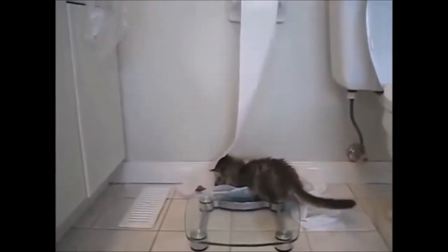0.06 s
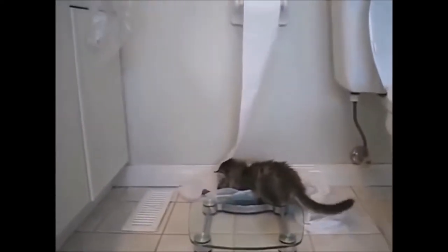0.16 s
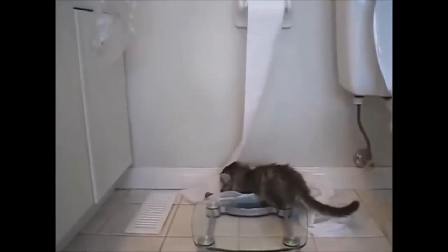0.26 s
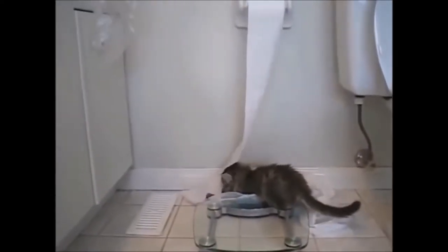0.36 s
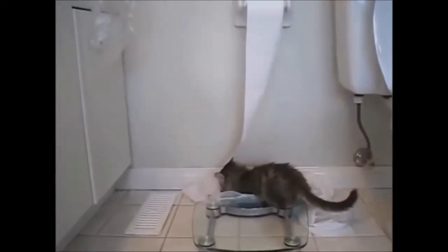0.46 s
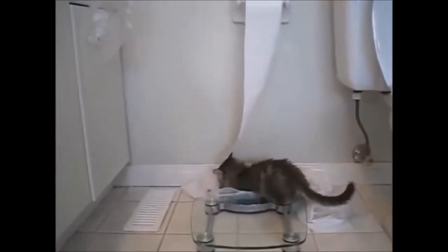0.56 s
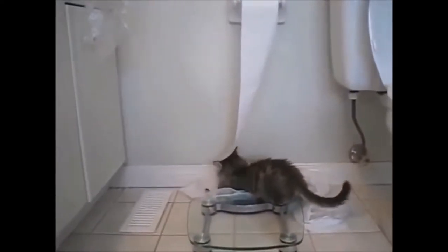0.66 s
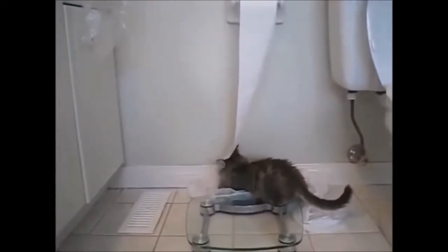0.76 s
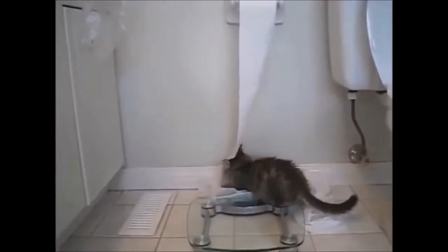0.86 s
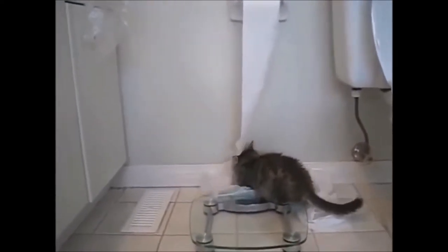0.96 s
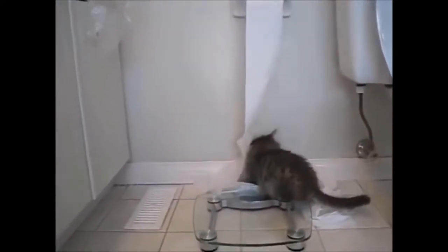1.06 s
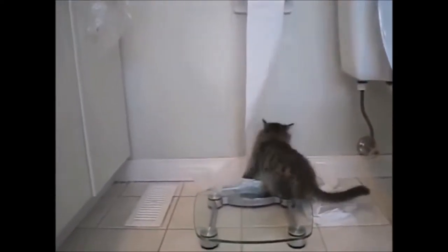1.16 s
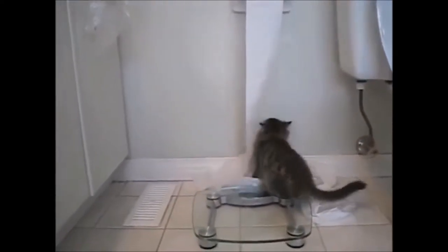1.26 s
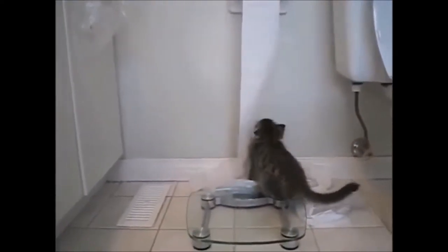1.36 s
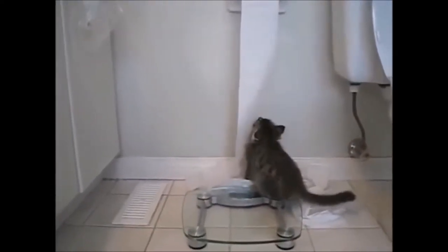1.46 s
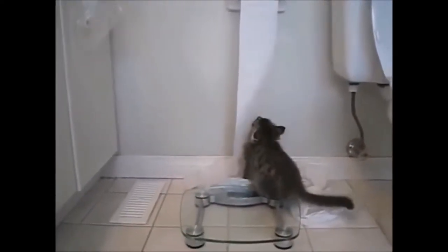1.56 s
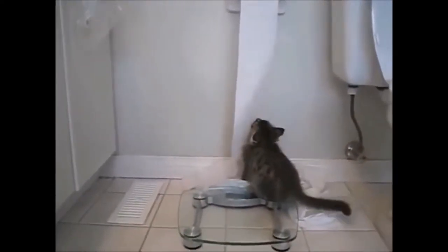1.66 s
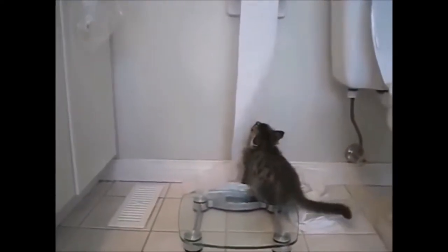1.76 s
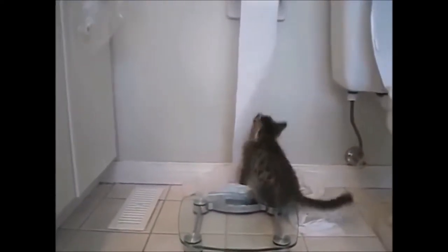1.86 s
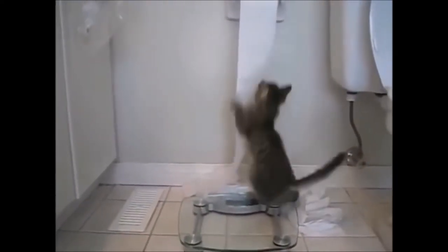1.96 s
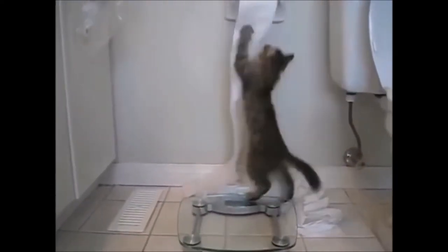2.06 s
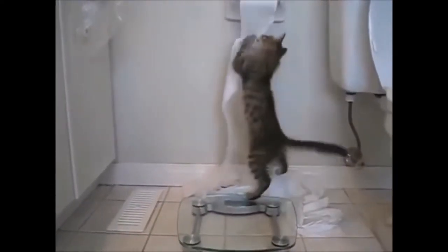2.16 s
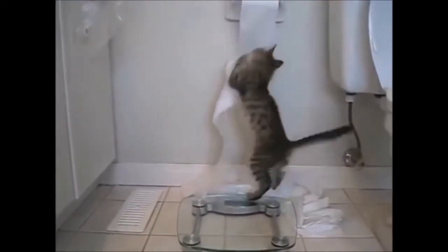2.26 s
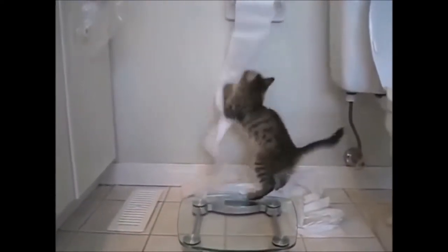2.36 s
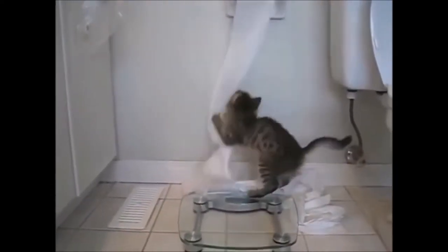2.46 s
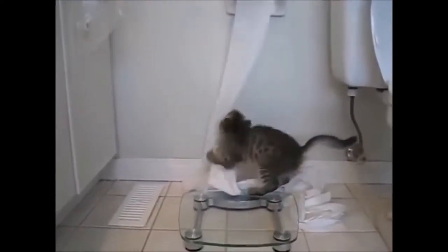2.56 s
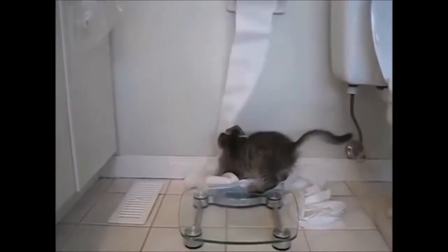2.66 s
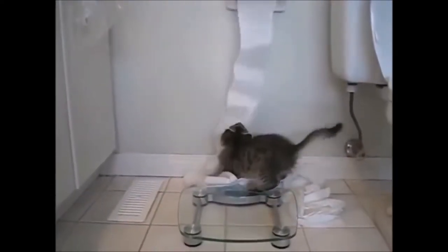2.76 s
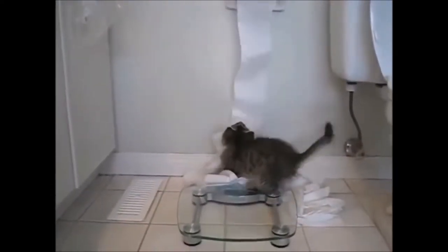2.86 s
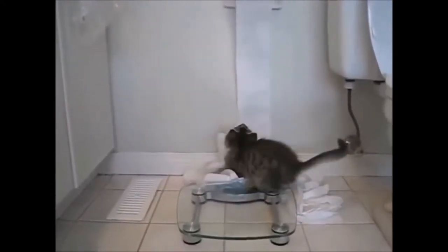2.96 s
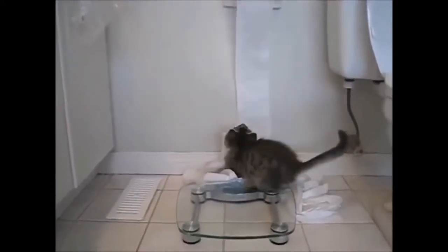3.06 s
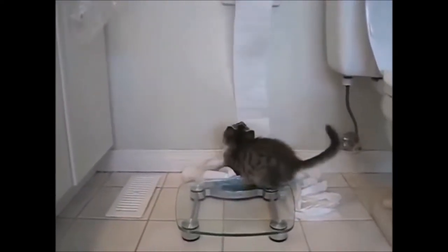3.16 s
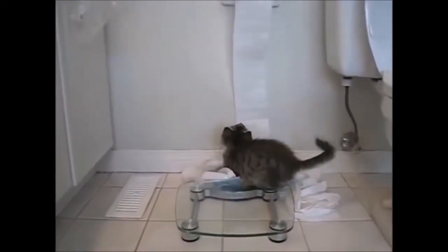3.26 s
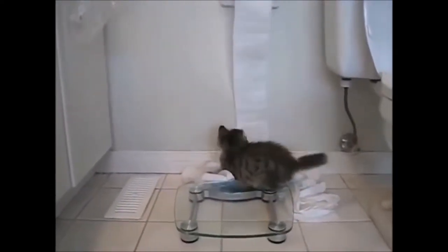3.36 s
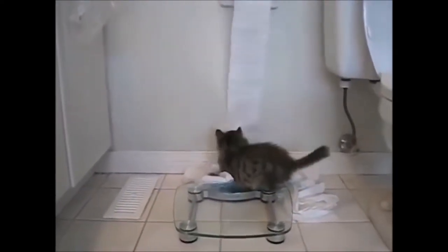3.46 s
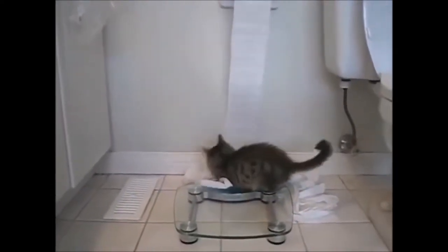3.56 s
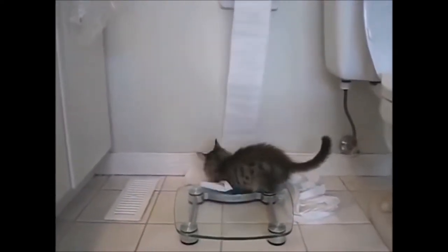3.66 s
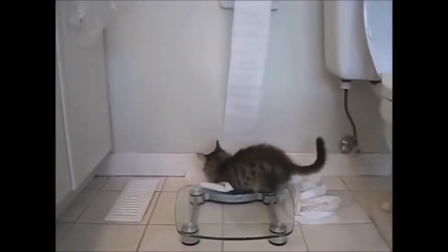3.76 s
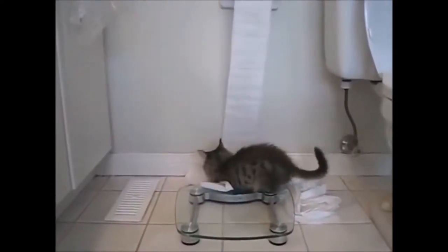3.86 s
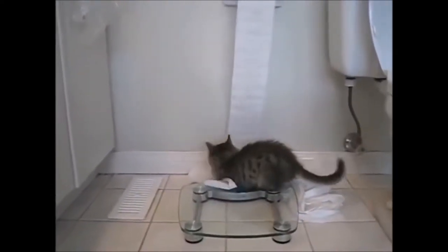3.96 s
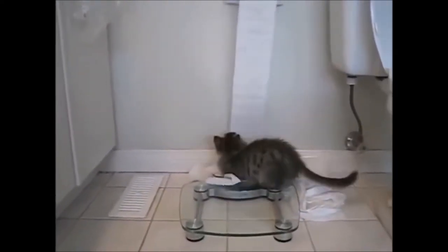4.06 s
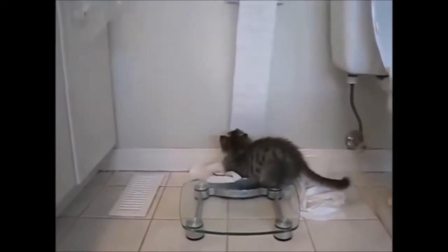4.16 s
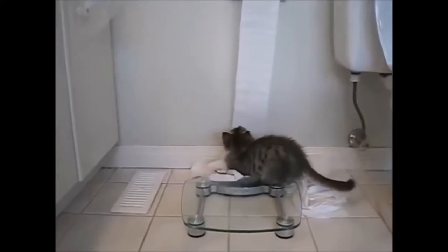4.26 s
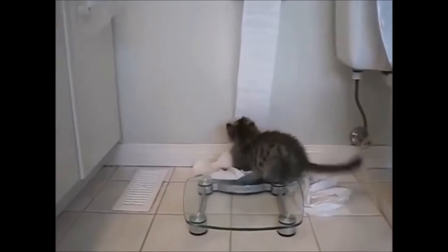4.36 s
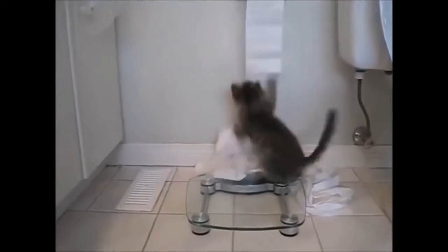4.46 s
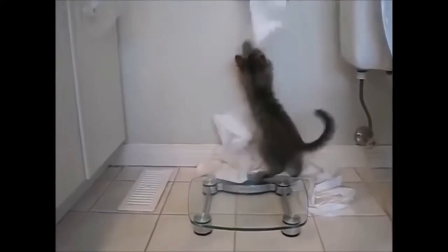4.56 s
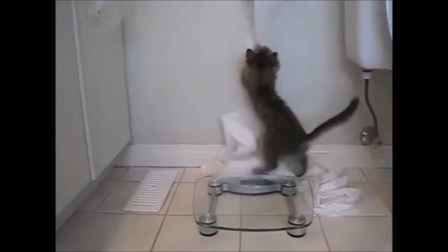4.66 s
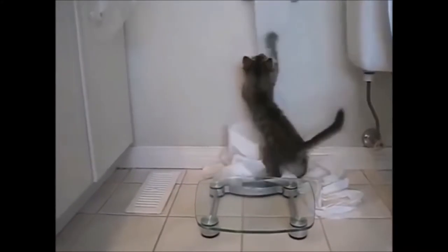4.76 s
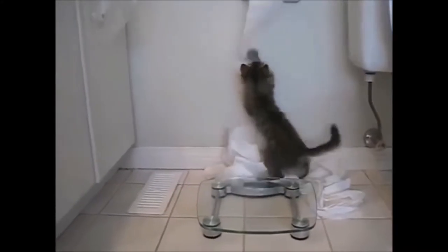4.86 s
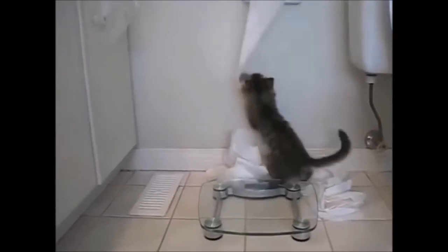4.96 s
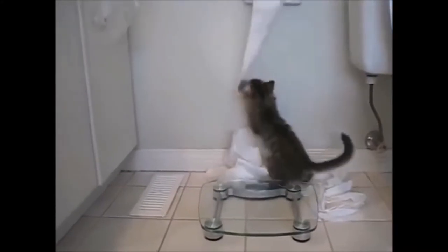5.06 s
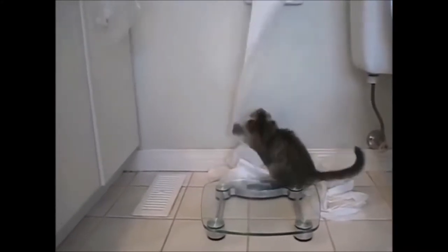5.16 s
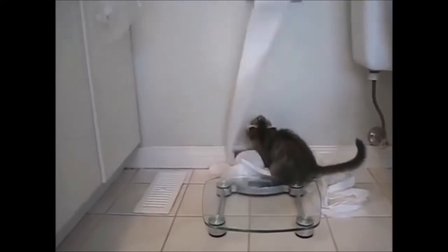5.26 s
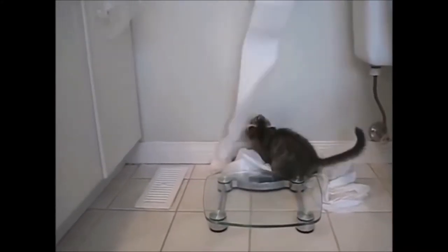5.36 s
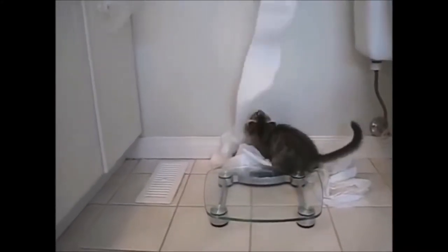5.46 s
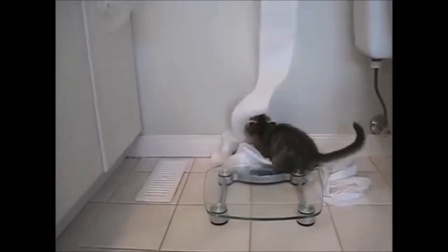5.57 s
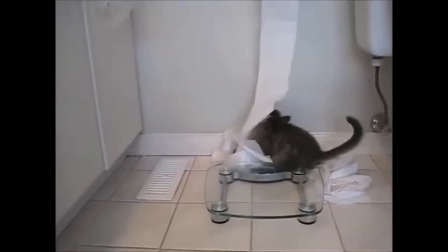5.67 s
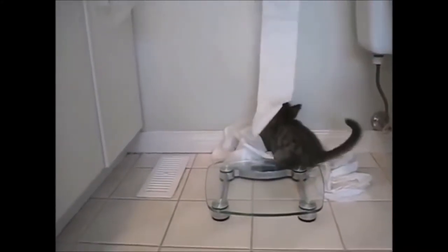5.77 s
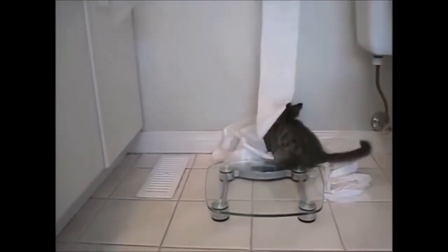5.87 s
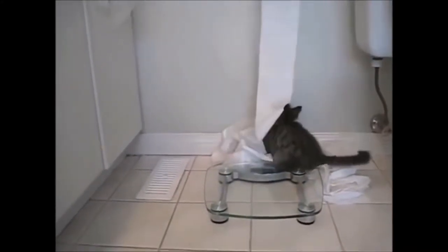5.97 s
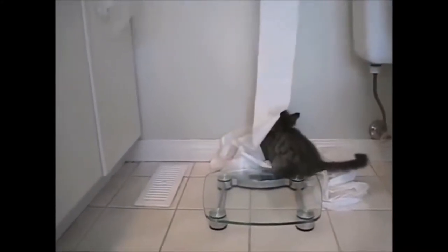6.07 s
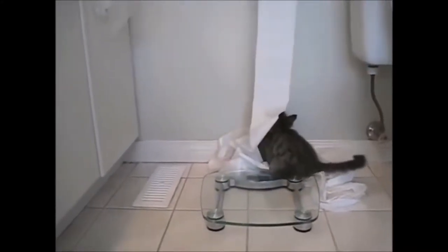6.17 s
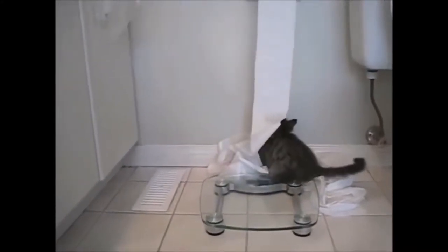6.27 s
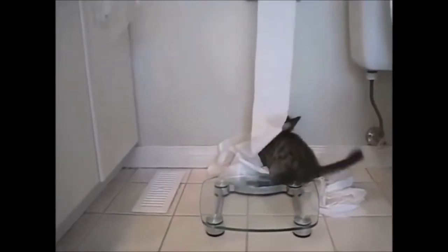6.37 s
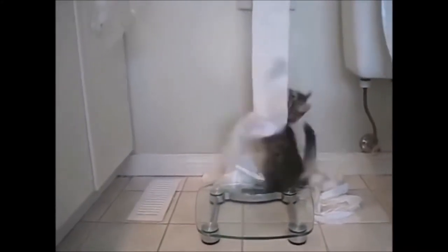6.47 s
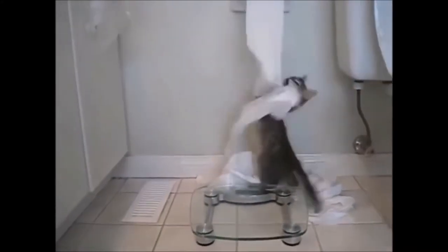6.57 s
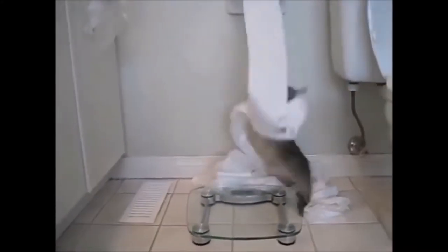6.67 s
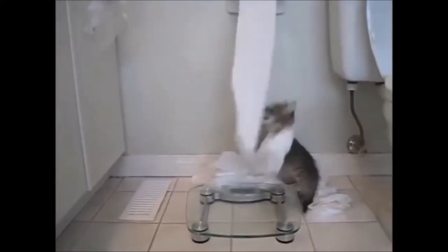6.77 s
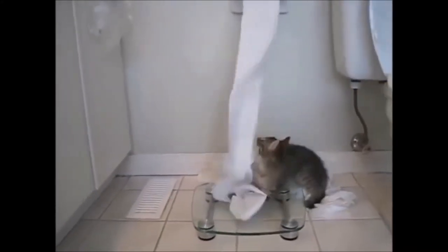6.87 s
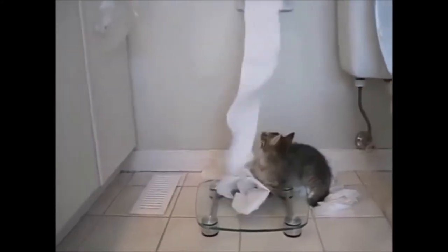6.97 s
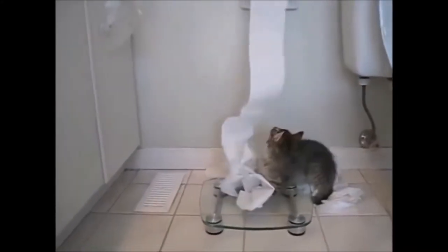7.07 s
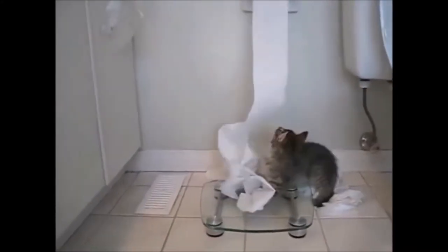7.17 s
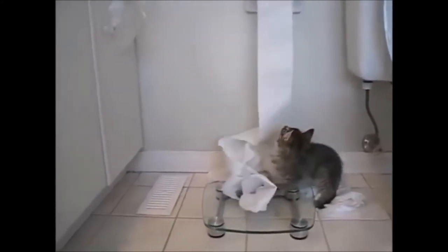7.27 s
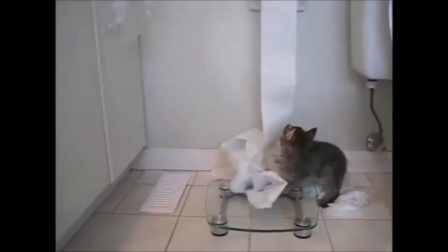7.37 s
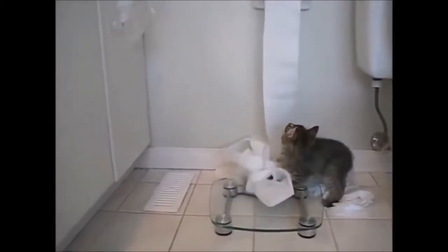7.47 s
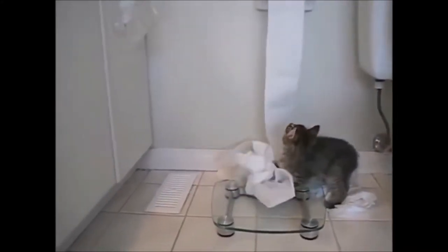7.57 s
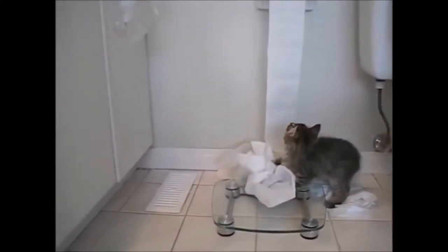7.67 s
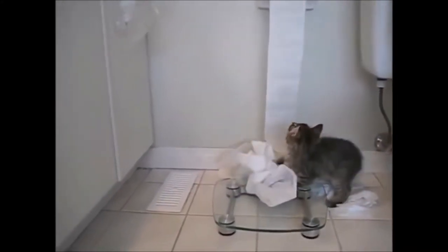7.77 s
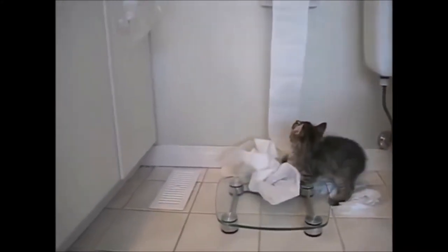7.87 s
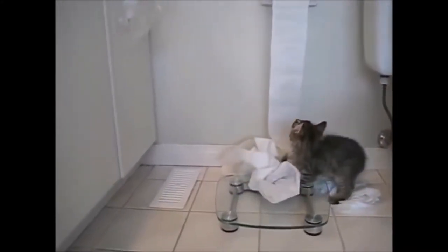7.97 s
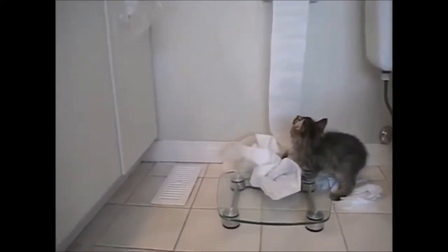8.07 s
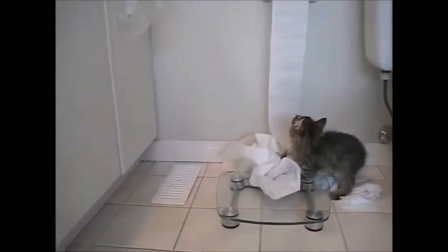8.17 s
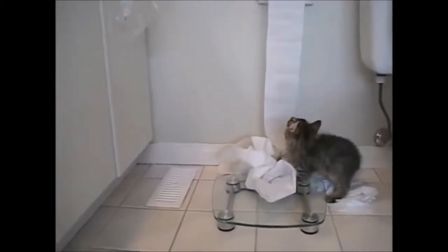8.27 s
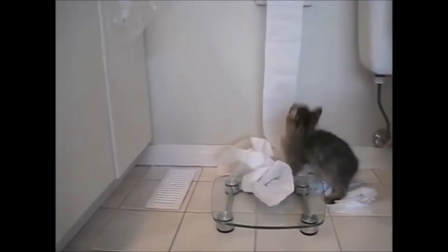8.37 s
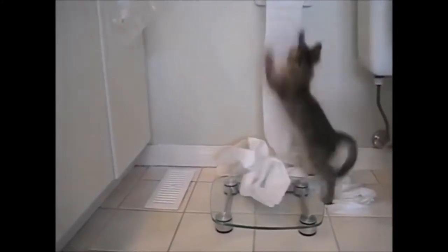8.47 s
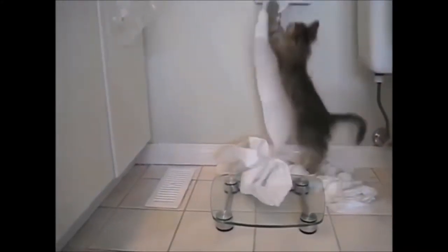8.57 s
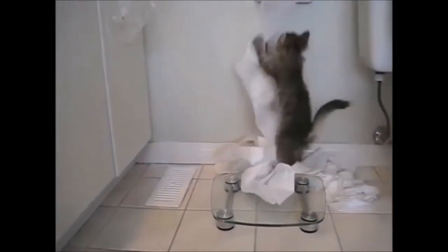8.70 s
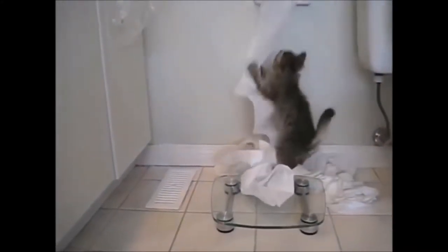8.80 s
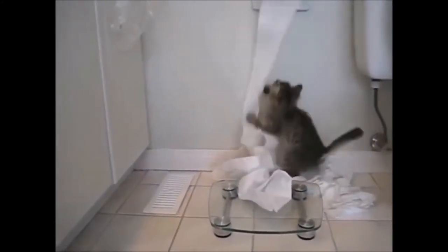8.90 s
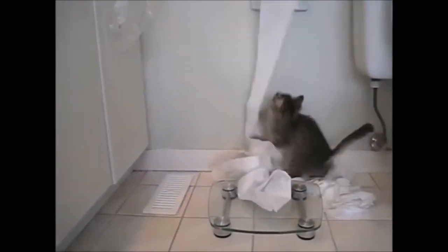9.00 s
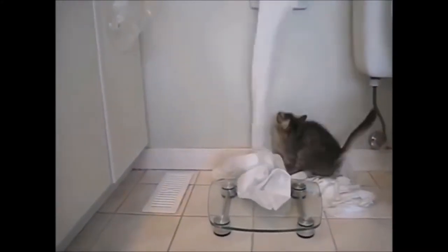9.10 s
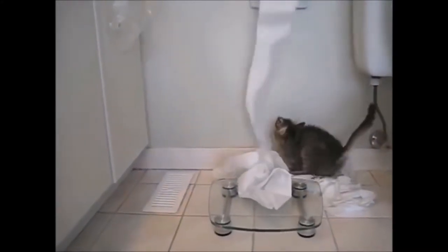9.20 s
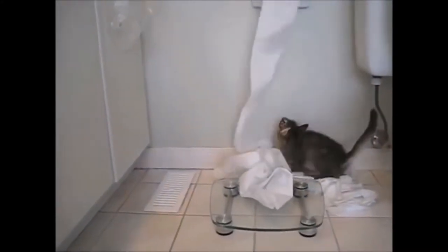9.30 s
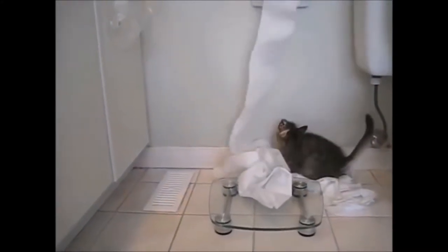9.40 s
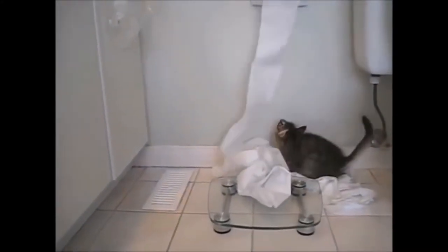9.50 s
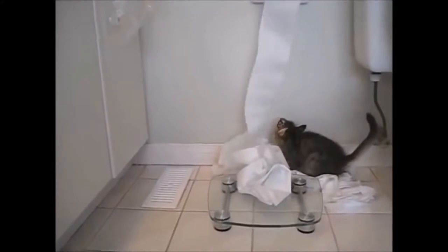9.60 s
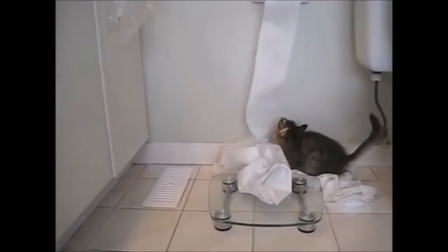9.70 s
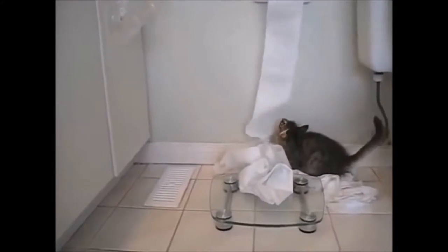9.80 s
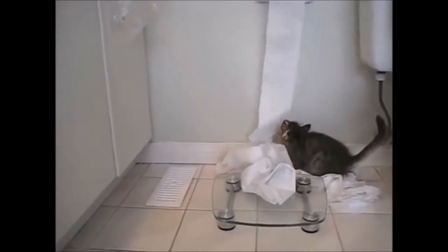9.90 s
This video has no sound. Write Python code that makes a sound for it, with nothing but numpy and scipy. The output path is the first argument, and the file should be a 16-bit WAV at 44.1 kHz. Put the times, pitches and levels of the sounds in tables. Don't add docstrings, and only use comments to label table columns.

```python
import sys
import numpy as np
from scipy import signal
from scipy.io import wavfile
from scipy.ndimage import uniform_filter1d

SR = 44100
rng = np.random.default_rng(int(sys.argv[2]) if len(sys.argv) > 2 else 0)


def to_linear_factor(level_db):
    exponent = np.asarray(level_db, float) / 20
    return 10 ** exponent


def inscribe(sig):
    pcm = np.round(np.clip(np.atleast_2d(sig).T, -1, 1) * 32767)
    wavfile.write(sys.argv[1], SR, pcm.astype(np.int16))


N = 438354

# [t/s, fade length/s, rustle level/dB, brightness/dB]
BRUSHES = [(0.0, 0.11, -53, -9), (.1, .15, -51, 0.5), (.18, 0.11, -42.5, -1), (.8, 0.42, -51, 9),
           (.95, 0.33, -49.5, -1.5), (1.05, 0.22, -51, -0.5), (1.3, 0.13, -44, -2.5),
           (1.41, 0.09, -49, -2.5), (2.01, 0.24, -50.5, -2), (3.15, 0.4, -54, -3.5),
           (3.52, 0.45, -44.5, -0.5), (4.1, 0.34, -49, -2), (4.65, 0.55, -43, -1), (5.78, 0.26, -55.5, 2),
           (5.92, 0.25, -51.5, 0.5), (6.56, .2, -48, -6), (7.4, 0.54, -47.5, -3.5), (7.49, 0.13, -47, 1),
           (8.49, 0.96, -54.5, 0)]
# [t/s, fade length/s, rustle level/dB, brightness/dB]
TUGS = [(2.3, .2, -51, -2), (2.385, 0.1, -43, -2), (2.78, 0.053, -36.5, -7), (4.85, 0.047, -35, -3.5),
        (4.95, 0.81, -39, -2), (5.09, 0.18, -37.5, -8.5), (5.22, 0.59, -40.5, -4), (5.38, 0.15, -36.5, 3),
        (5.48, 0.021, -33.5, 0.5), (5.575, .05, -47, -6), (5.67, 0.051, -43.5, -17), (6.68, 0.15, -32, 0),
        (6.88, 0.35, -33.5, -5.5), (6.98, 0.26, -35, -7), (7.13, 0.27, -36, -5), (7.58, 0.22, -43, 3.5),
        (9.26, 0.43, -37.5, -1.5), (9.55, 0.81, -51.5, -4)]
# [t/s, fade length/s, rustle level/dB, brightness/dB]
YANKS = [(.535, 1, -52, 1), (2.19, 0.18, -46, 2), (2.475, 0.37, -36.5, -5), (2.655, 0.32, -38.5, -2.5),
         (2.955, 0.22, -38.5, -4.5), (4.51, 0.44, -46, -2.5), (6.47, .3, -51.5, -3),
         (8.68, 0.31, -42, -6.5), (8.815, 0.14, -35, -7), (8.97, 0.48, -41.5, -2), (9.86, .3, -42, -3)]
# [f/Hz, level/dB per Hz]
TISSUE = [(150, -46), (250, -6.5), (380, -9.5), (476, -1.5), (547, -5.5), (906, -2.5), (2400, -1),
          (5070, -3.5), (7570, -10.5), (11300, -11), (16000, -21.5)]


def sheet():
    dulling_db = 4
    level_db, bright_db = blend(
        (-70.5, -12),
        strokes(BRUSHES, rise_db_per_s=236, bend=1.67, dulling_db=dulling_db),
        strokes(TUGS, rise_db_per_s=220, bend=1.61, dulling_db=dulling_db),
        strokes(YANKS, rise_db_per_s=700, bend=2.08, dulling_db=dulling_db))
    crumple = np.clip(0.5 + (level_db + 35.5) / 60, 0, 1)
    grains = crackle(N, 3000 * lumpy(70, 3.5), 1.8)
    hiss = rng.standard_normal(N) * lumpy(40, 0.39)
    drive = (1 - crumple) * hiss + crumple * grains
    body = evened(patchy(coloured(drive, TISSUE), depth_db=1.83))
    return to_linear_factor(level_db + 0.64) * (body + treble(body, 3130) * (to_linear_factor(bright_db + 1) - 1))


def strokes(rows, rise_db_per_s, bend, dulling_db=0):
    s, length, db, colour_db = np.transpose(rows)[:, :, None]
    late = np.arange(0, N, 64) / SR - s
    faded = np.maximum(late, 0) / np.maximum(length, 0.01)
    rise_db = rise_db_per_s * np.minimum(late, 0)
    fade_db = 20 * np.minimum(faded, 9) ** bend
    return to_linear_factor(db + rise_db - fade_db) ** 2, colour_db - dulling_db * faded


def blend(at_rest, *groups):
    power, colour_db = map(np.vstack, zip(*groups))
    rest_power = to_linear_factor(at_rest[0]) ** 2
    total = power.sum(0) + rest_power
    mean_db = ((power * colour_db).sum(0) + rest_power * at_rest[1]) / total
    curves = (10 * np.log10(total), mean_db)
    return [np.interp(np.arange(N), np.arange(0, N, 64), c) for c in curves]


def patchy(x, depth_db):
    hz, t, z = signal.stft(x, SR, nperseg=256)
    folds = rng.standard_normal(z.shape[::-1])
    folds = uniform_filter1d(uniform_filter1d(folds, size=12, axis=0), size=5, axis=1)
    return signal.istft(z * to_linear_factor(depth_db * evened(folds).T), SR, nperseg=256)[1][:N]


# [t/s, peak level/dB, ring f/Hz, treble/dB]
SNAPS = [(0.591, -36.5, 4200, -4), (2.3559, -31, 2080, -16), (2.654, -18.5, 1710, -18),
         (2.8315, -27, 2200, -14), (2.8428, -22.5, 1800, -17), (2.9343, -36, 2030, -8),
         (2.9473, -18, 1800, -10), (2.9665, -14.5, 1820, -10), (5.3662, -27, 1340, -15),
         (5.482, -18.5, 1350, -13.5), (5.5694, -23.5, 1900, -12), (5.6429, -30.5, 1780, -28),
         (5.901, -43.5, 3820, -3), (6.9581, -18, 4570, -19), (6.9776, -11.5, 3130, -17),
         (7.1152, -15.5, 1350, -9.5), (7.2795, -30, 1350, -23), (7.3594, -28, 1280, -15),
         (7.4847, -33, 1760, -19), (7.5958, -13.5, 3100, -11), (8.8122, -18.5, 4300, -11.5),
         (9.188, -29, 3130, -14), (9.2275, -19.5, 3400, -10.5), (9.599, -26.5, 3530, -10.5),
         (9.629, -31, 1400, -22), (9.8556, -17, 1450, -9.5), (9.9354, -20.5, 4600, -11)]
# [t/s, peak level/dB, ring f/Hz, treble/dB]
KNOCKS = [(0.5921, -31.5, 1090, -15), (2.1917, -22.5, 965, -11.5), (2.4648, -24, 2400, -18),
          (3.176, -35, 2390, -12), (4.4892, -48, 4460, -12), (4.7589, -21, 1350, -29),
          (4.9701, -27.5, 991, -18), (5.5488, -25.5, 2240, -12), (6.4714, -34.5, 1620, -12),
          (6.671, -21.5, 982, -10), (6.8678, -16, 3210, -13), (7.0883, -36, 3120, -12),
          (8.6625, -35, 1260, -20), (8.7503, -25.5, 1030, -29), (8.9662, -20, 3280, -12),
          (9.0972, -25.5, 2230, -18), (9.3994, -33, 1800, -14), (9.7417, -30.5, 3200, -28)]
# [t/s, peak level/dB, ring f/Hz, treble/dB]
CRUSHES = [(2.2327, -24, 2240, -12.5), (2.4939, -18.5, 2350, -23), (2.5381, -18, 1320, -14.5),
           (2.762, -29.5, 2310, -6), (2.9896, -19.5, 1790, -16), (3.0997, -28, 1380, -16),
           (4.8444, -36, 3470, -22), (5.0864, -18, 1320, -19), (6.612, -28, 2300, -13),
           (6.6477, -24, 999, -16), (6.6927, -17.5, 2760, -20), (6.8803, -17.5, 1940, -17),
           (7.201, -18, 3900, -9), (7.5875, -25, 3360, -22), (7.6117, -20, 2040, -24),
           (8.6885, -23, 1830, -10), (8.9841, -18.5, 1990, -12.5), (9.2884, -22, 1340, -15),
           (9.3072, -16, 1780, -10), (9.3193, -18, 2300, -8), (9.4618, -21.5, 3200, -10.5)]
# [t/s, peak level/dB, ring f/Hz, treble/dB]
TICKS = [(0.5867, -39, 1070, -14), (2.3835, -30, 1940, -14), (2.7954, -23, 1840, -10),
         (2.8315, -23, 1760, -17), (3.0924, -30, 1380, -14), (4.5141, -39, 1390, -16),
         (4.6724, -30, 3890, -14), (4.7082, -32, 2250, -14), (4.9501, -37, 1050, -14),
         (5.0787, -21, 2280, -14), (5.091, -22, 1320, -10), (5.3198, -22, 2170, -14),
         (5.3672, -17, 1350, -14), (5.471, -28, 1360, -14), (5.5488, -29, 2240, -14),
         (5.5728, -22, 2060, -14), (5.647, -28, 3630, -14), (5.6604, -27, 3120, -17),
         (5.6794, -27, 1120, -14), (6.5765, -34, 2320, -14), (6.679, -15, 3730, -9.5),
         (6.8319, -24, 2310, -14), (7.1368, -17, 1250, -9), (7.2111, -23, 2010, -10),
         (7.5931, -17, 3400, -14), (7.6057, -12, 2020, -14), (8.6854, -22, 3960, -12),
         (8.6964, -27, 2430, -14), (8.75, -27, 1030, -19), (8.8129, -12, 4160, -18),
         (9.1875, -26, 3110, -14), (9.269, -27, 1740, -10), (9.4034, -31, 1800, -14),
         (9.4615, -26, 2680, -14), (9.7344, -31, 3110, -17)]
# [f/Hz, level/dB per Hz]
KNOCK_COLOUR = [(120, -17.5), (200, -8.5), (867, -4.5), (1770, -1.5), (2800, -1.5), (3190, -3), (3490, -3),
                (9930, -15.5), (16000, -27.5)]


def snaps(rows, rise_ms, ring, ms, full_db):
    out = np.zeros(N)
    low_cut = signal.butter(3, 1150, "high", fs=SR, output="sos")
    for s, db, hz, treble_db in rows:
        clump = coloured(burst(ms, 14000, rise_ms), KNOCK_COLOUR)
        clump = clump + ring * resonate(clump, hz, 274)
        high = treble(clump, 3850)
        low = clump - signal.sosfiltfilt(low_cut, clump)
        shaped = clump + high * (to_linear_factor(treble_db + 15) - 1) + low * (to_linear_factor(full_db + 16) - 1)
        add(out, s, to_linear_factor(db - 10.0) * shaped)
    return out


def burst(ms, per_s, rise_ms):
    clicks = crackle(count=4000, per_s=per_s, spread_db=1.0)
    t = np.arange(len(clicks)) / SR * 1000
    decay = np.exp(-t / max(ms, 1)) + 0.91 * np.exp(-t / 2.1)
    return clicks * decay * (1 - np.exp(-t / max(rise_ms, 0.1)))


# [t/s, peak level/dB, f/Hz]
CRACKS = [(.588, -36, 5500), (2.496, -25, 3200), (2.541, -26, 4600), (2.655, -27, 4000), (2.767, -28, 3500),
          (2.846, -24, 4500), (5.368, -24, 5000), (5.472, -28, 6000), (5.484, -24, 6500),
          (7.043, -26, 4500), (7.09, -28, 5000), (7.212, -25, 5200), (7.598, -22, 7000),
          (8.8145, -16, 4800), (9.098, -30, 4000), (9.229, -23, 4500), (9.463, -24, 8000),
          (9.9365, -24, 4800)]


def cracks():
    out = np.zeros(N)
    ms = np.arange(-90, 90) / SR * 1000
    for s, db, hz in CRACKS:
        cycles = hz * ms / 1000
        add(out, s - 0.002, to_linear_factor(db) * np.exp(-(cycles / 1.1) ** 2) * np.sin(2 * np.pi * cycles))
    return out


# [f/Hz, width/Hz, level/dB]
HOLDER_MODES = [(1352, 39, 1), (1792, 39, -5), (2305, 90, -7), (3215, 70, -8), (3720, 200, -9.5)]


def holder(x):
    return sum(to_linear_factor(db) * resonate(x, hz, width) for hz, width, db in HOLDER_MODES)


# [t/s, peak level/dB, ring f/Hz, length/ms]
PAWS = [(0.187, -36, 243, 14), (0.19, -42, 250, 22), (0.327, -46, 178, 25), (0.59, -46, 1110, 25),
        (2.959, -28.5, 128, 48), (4.599, -38, 900, 25), (4.756, -25, 750, 29), (5.109, -25, 570, 24),
        (5.319, -21, 550, 14), (5.499, -23, 590, 29), (6.668, -16, 933, 27), (7.619, -26.5, 240, 29),
        (8.752, -27, 480, 19), (9.879, -24.5, 557, 14)]


def paws():
    out = np.zeros(N)
    for s, db, hz, ms in PAWS:
        clump = burst(ms, 5000, 0.7)
        add(out, s, to_linear_factor(db + 4.0) * (resonate(clump, hz, 137) + 0.36 * resonate(clump, 340, 500)))
    return out


# [t/s, f/Hz, level/dB, t60/s]
GLASS = [
    (6.978, 2976, -22.5, .36),
    (6.978, 2940, -19, .035),
    (6.978, 1588, -25.5, .35),
    (6.988, 580, -23.5, .12),
    (7.013, 600, -21, .06),
    (7.013, 592, -26, 1.5),
    (7.038, 600, -31, .1),
    (7.0755, 592, -33, .3),
    (7.033, 560, -33, .15),
]
# [t/s, f/Hz, level/dB, t60/s]
RINGS = [(6.833, 2275, -27, 0.12), (6.958, 4500, -22, 0.047), (6.978, 4790, -34.5, 0.31),
         (6.978, 3420, -34, 0.16), (6.978, 2330, -29, 0.19), (7.115, 1400, -37, .2),
         (2.949, 1306, -34, 0.15), (2.948, 1770, -38, 0.2), (6.835, 1290, -37, 0.25), (.18, 1800, -64, .12),
         (.18, 2700, -46, .12), (0.183, 950, -42.5, 0.11), (0.177, 492, -42.5, 0.17),
         (0.192, 250, -39, 0.08), (4.97, 1010, -24, 0.018), (7.117, 3150, -37, 0.23),
         (7.605, 3250, -33, 0.1), (7.0, 672, -30, 0.17), (7.108, 572, -33, 0.38), (7.18, 575, -47, .3),
         (7.214, 500, -33.5, .15), (7.14, 1255, -33, .15), (7.2, 2010, -38, 0.18), (6.671, 985, -23.5, .07),
         (6.69, 1120, -36, .12), (8.752, 1030, -32.5, .06), (8.757, 620, -32.5, .12),
         (8.664, 1000, -39, 0.11), (2.48, 760, -32, 0.065), (2.53, 720, -35.5, .2), (2.662, 1700, -35, .1),
         (7.0, 41, -44, .7), (5.322, 550, -35, .08), (7.013, 3010, -38, 0.15), (7.04, 4840, -42, .15),
         (7.29, 3150, -44, .1), (2.193, 975, -38, .05), (2.192, 2400, -29, .05), (5.505, 560, -32, 0.15),
         (9.864, 1765, -30, .13), (4.6, 230, -46, .15), (5.17, 262, -38.5, 0.19), (7.6, 2050, -29.5, 0.13),
         (7.6, 2800, -42, .08)]
# [t/s, f/Hz, level/dB, t60/s]
TAPS = [(.192, 540, -39, .05), (.2, 240, -35, .05), (.327, 110, -47, .06), (2.233, 900, -36, .06),
        (2.555, 1500, -31, .08), (2.715, 200, -35, .08), (2.8315, 2200, -31, .02), (2.975, 190, -34, .1),
        (5.0, 3100, -35, .1), (5.367, 2300, -27, .025), (5.375, 200, -36, .08), (6.765, 1600, -33, .08),
        (6.83, 200, -38, .1), (6.925, 1380, -31, .07), (7.365, 1700, -38, .06), (8.751, 1700, -30, .025),
        (8.753, 240, -33, .06), (8.83, 950, -31, .06), (9.188, 3150, -33, .02), (9.235, 200, -41, .1),
        (9.31, 3400, -34, .1), (9.318, 1750, -31, .1), (9.856, 3600, -24, .025), (9.872, 2700, -33, .08),
        (9.875, 250, -36, .1)]


def rings():
    out, t = np.zeros(N), np.arange(SR) / SR
    for s, hz, db, t60 in GLASS + RINGS + TAPS:
        pair = np.sin(2 * np.pi * hz * t) + 0.25 * np.sin(2 * np.pi * (hz + 27) * t)
        damped_db = -15 * np.clip((s + t - 7.102) / 0.006, 0, 1) * (6.9 < s < 7.1)
        add(out, s, to_linear_factor(db - 60 * t / t60 + damped_db) * pair * (1 - np.exp(-t / 0.00052)))
    return out * lumpy(90, 0.79)


# [t/s, coasting length/s, drumming level/dB, cardboard rattle above it/dB]
SPINS = [(.19, 0.23, -54, 4.5), (.61, 0.14, -56.5, 1), (2.19, 0.17, -67, 15), (2.32, 0.73, -51, -1.5),
         (2.52, 0.57, -47, 10), (2.75, 0.29, -42, -3), (2.93, 0.53, -46.5, -0.5), (3.54, 2, -72.5, 14.5),
         (4.64, 0.045, -63, 7), (4.9, .4, -58.5, 4), (5.05, 0.58, -48, -2), (5.19, 0.073, -46.5, 1),
         (5.38, .3, -46, -4), (5.5, 0.44, -44, -3.5), (6.7, 0.87, -47, 1), (6.97, 0.85, -42, -1),
         (7.61, 0.21, -48, 2.5), (8.69, 1.15, -46.5, 5.5), (9.35, 0.92, -47, 0), (9.87, 0.11, -42, -1)]
# [f/Hz, level/dB per Hz]
DRUM = [(15, -46), (25, -22), (59, -8), (87, -2.5), (156, 0.5), (254, 1), (317, -19), (356, 2.5),
        (400, -15), (520, -18), (880, -120)]


def roll():
    spins = strokes(SPINS, rise_db_per_s=266, bend=1.62)
    drum_db, rattle_db = blend((-71, 3.8), spins)
    bumps = rng.standard_normal(N) + 0.49 * crackle(N, 300, 1.1)
    drum = evened(coloured(bumps, DRUM))
    drum = evened(drum + 1.54 * resonate(drum, 92.6, 18) + 1.9 * resonate(drum, 158.7, 26))
    rattle = evened(resonate(bumps, 404, 450) + 1.2 * resonate(bumps, 548, 220))
    return to_linear_factor(drum_db) * (drum + to_linear_factor(rattle_db - 2.5) * rattle)


# [f/Hz, level/dB per Hz]
AIR = [(20, 7), (120, -2), (500, -15), (1100, 3), (1900, -26), (4500, -11), (9000, -14.5), (16000, -23.5)]
# [f/Hz, width/Hz, level/dB]
VENT = [(303, 19, -66.5), (925, 62, -61), (7830, 55, -83)]
# [t/s, level/dB]
AFTER_RING = [
    [(5.9, -86), (6.2, -67), (6.45, -72)],
    [(7.75, -64), (8.0, -63.5), (8.2, -70), (8.45, -85)],
]


def air():
    out = to_linear_factor(-63.5) * evened(coloured(rng.standard_normal(N), AIR))
    for hz, width, db in VENT:
        out += to_linear_factor(db) * evened(resonate(rng.standard_normal(N), hz, width))
    hum = evened(resonate(rng.standard_normal(N), 1640, 50))
    for rows in AFTER_RING:
        s, db = np.transpose(rows)
        out += to_linear_factor(np.interp(np.arange(N) / SR, s, db, -120, -120)) * hum
    return out


# [f/Hz, t60/s]
TILES = [(100, 0.82), (400, 0.45), (1000, 0.42), (2800, 0.29), (7300, 0.14), (15000, 0.22)]


def bathroom(x):
    taps = np.zeros(SR)
    at = np.arange(80, SR - 20, 16)
    taps[at + rng.integers(0, 16, len(at))] = rng.choice([-1., 1.], len(at))
    hz, t, z = signal.stft(taps, SR, nperseg=256)
    decay = to_linear_factor(-60 * t / read(TILES, hz)[:, None])
    tail = signal.istft(z * decay, SR, nperseg=256)[1]
    return signal.fftconvolve(x, tail / np.linalg.norm(tail))[:N]


def evened(x):
    return x / np.sqrt(np.mean(x ** 2) + 1e-20)


def read(points, hz):
    f, value = np.transpose(points)
    return np.interp(np.log(hz + 1), np.log(f + 1), value)


def add(mix, s, sound):
    part = mix[round(s * SR):][:len(sound)]
    part += sound[:len(part)]


def coloured(x, points):
    level_db = read(points, abs(np.fft.fftfreq(4096, 1 / SR)))
    gain = np.log(to_linear_factor(np.maximum(level_db, -100)))
    taps = np.fft.ifft(np.exp(np.conj(signal.hilbert(gain)))).real
    return signal.oaconvolve(x, taps / np.linalg.norm(taps))[:len(x)]


def resonate(x, hz, width):
    return signal.lfilter(*signal.iirpeak(hz, hz / width, SR), x)


def treble(x, hz):
    return signal.sosfilt(signal.butter(2, hz, "high", fs=SR, output="sos"), x)


def lumpy(per_s, spread_db):
    return to_linear_factor(spread_db * evened(uniform_filter1d(rng.standard_normal(N), int(SR / per_s))))


def crackle(count, per_s, spread_db):
    draw = rng.random((count, 2))
    size = to_linear_factor(spread_db * np.minimum(-np.log(draw[:, 1] + 1e-9), 5))
    struck = draw[:, 0] < per_s / SR
    return evened(size * struck * rng.standard_normal(count))


def scene():
    paper, partials = sheet(), rings()
    jerks = snaps(SNAPS, rise_ms=0.34, ring=1.0, ms=8.3, full_db=-25.0)
    jerks += snaps(KNOCKS, rise_ms=0.69, ring=1.0, ms=7.1, full_db=-13)
    jerks += to_linear_factor(3.0) * snaps(CRUSHES, rise_ms=3.35, ring=0.89, ms=9.8, full_db=-15.5)
    jerks += to_linear_factor(-3.5) * snaps(TICKS, rise_ms=0.25, ring=1.8, ms=2.0, full_db=-29)
    steady = roll() + air()
    blows = paws() + cracks() + to_linear_factor(-1.5) * jerks + holder(jerks + to_linear_factor(-11.5) * paper)
    wet = to_linear_factor(-12.5) * paper + to_linear_factor(-4.0) * blows + to_linear_factor(-15.5) * partials
    mono = to_linear_factor(0.28) * paper + blows + partials + steady + bathroom(wet)
    return np.array([mono, mono])


# [t/s, length/ms, prominence needed to survive/dB]
THINNED = [(.08, 18, -1), (.19, 20, 0), (.36, 18, -4), (.712, 36, 3), (.83, 20, 1), (1.06, 18, 0),
           (1.175, 20, 1), (1.83, 16, 0), (2.28, 18, -2), (5.187, 24, 0), (5.214, 30, 3), (5.525, 16, -5),
           (5.695, 14, -5), (5.8, 18, -1), (6.31, 16, 0), (6.785, 18, -4), (7.058, 14, -6), (7.235, 16, -5),
           (7.868, 14, 0), (8.38, 16, -3), (8.47, 18, -1), (8.791, 14, -1), (8.979, 22, 1), (9.319, 20, 3),
           (9.447, 10, 0), (9.535, 12, -2), (9.578, 16, -1), (9.81, 16, -4), (9.847, 9, 8)]


def thinned(x):
    hz, t, z = signal.stft(x, SR, nperseg=1024, noverlap=768)
    z = z * (hz < 15850)[:, None]
    for s, ms, margin_db in THINNED:
        share = np.clip((ms / 2000 - abs(t - s)) / 0.003 + 1, 0, 1)
        hit = share > 0
        size = abs(z[:, hit]).mean(axis=1)
        local = abs(uniform_filter1d(size, size=40)) + 1e-12
        bar = to_linear_factor(margin_db - 3.5) * local ** 0.55 * local.max() ** 0.45
        kept = np.clip(size / bar, 0, 1) ** 14
        z[:, hit] *= 1 - share[hit] * (1 - 1.38 * kept[:, None])
    return signal.istft(z, SR, nperseg=1024, noverlap=768)[1][:N]


def band_limit(x):
    return signal.sosfilt(signal.butter(12, 16710, fs=SR, output="sos"), x)


def record(dry):
    mono = thinned(dry[0])
    return band_limit(np.array([mono, mono]))


dry = scene()
out = record(dry)
inscribe(out)
```